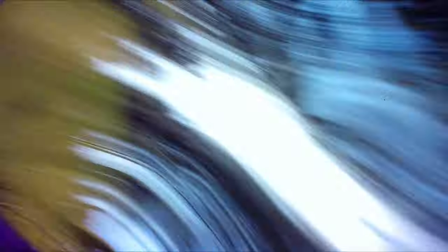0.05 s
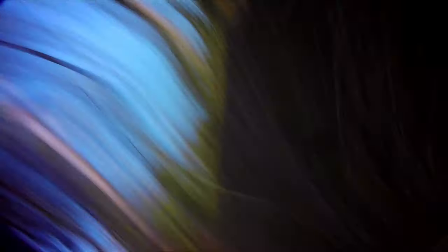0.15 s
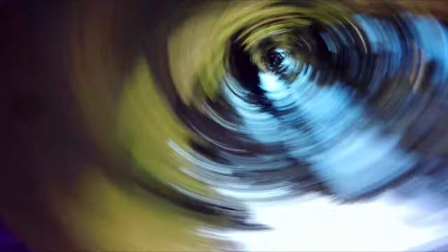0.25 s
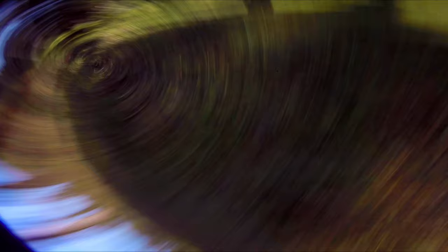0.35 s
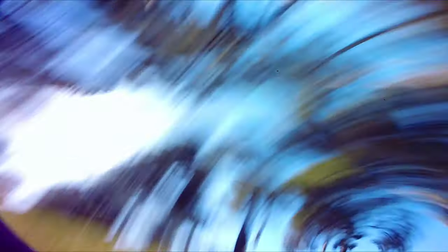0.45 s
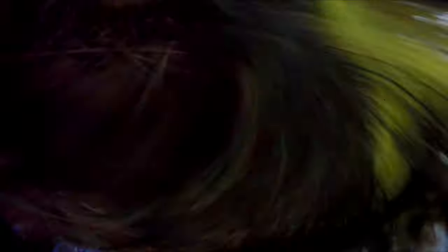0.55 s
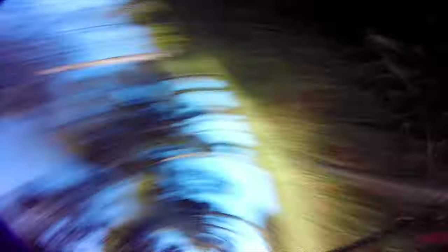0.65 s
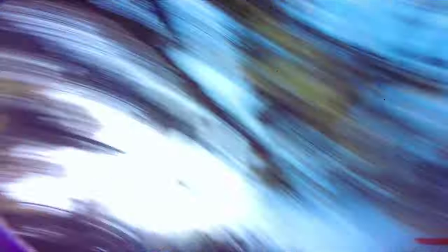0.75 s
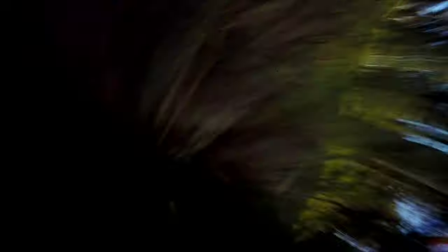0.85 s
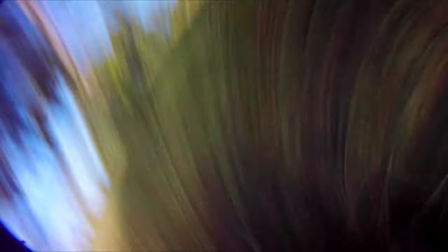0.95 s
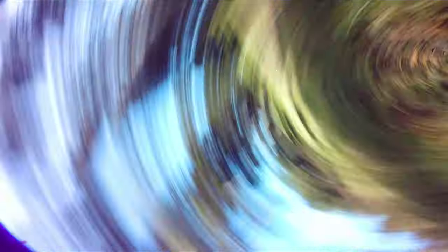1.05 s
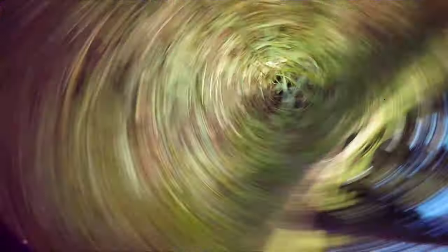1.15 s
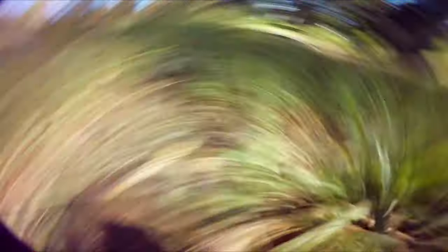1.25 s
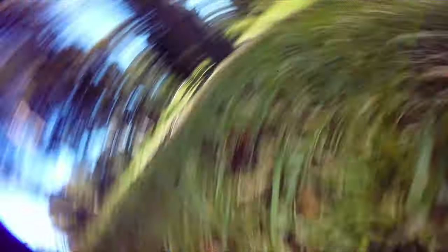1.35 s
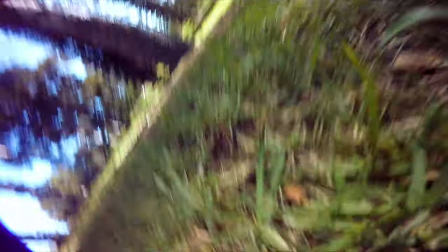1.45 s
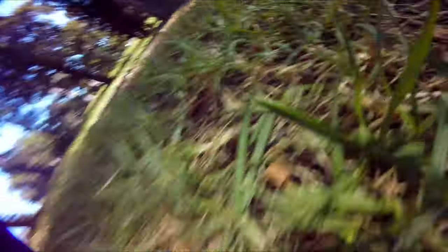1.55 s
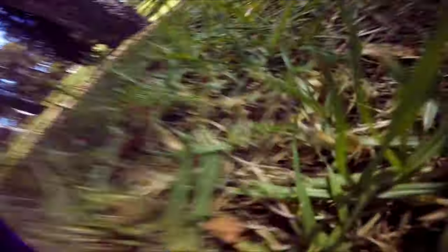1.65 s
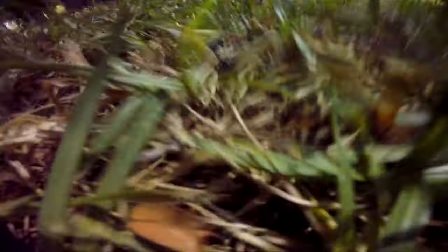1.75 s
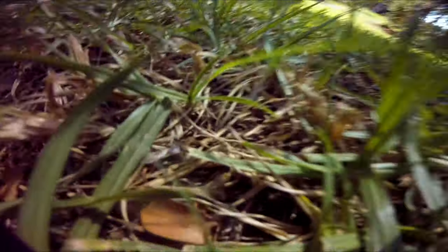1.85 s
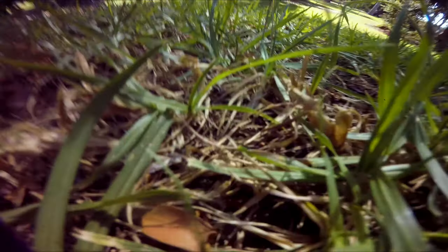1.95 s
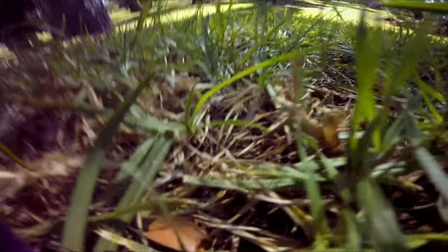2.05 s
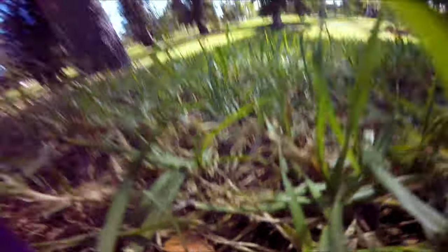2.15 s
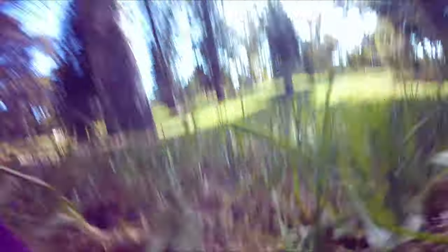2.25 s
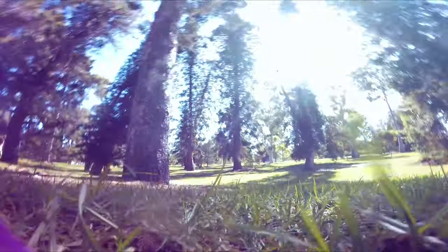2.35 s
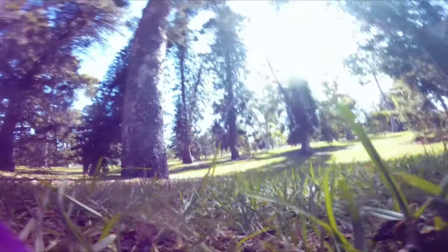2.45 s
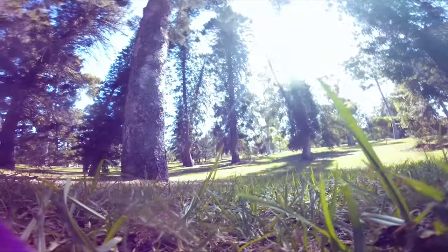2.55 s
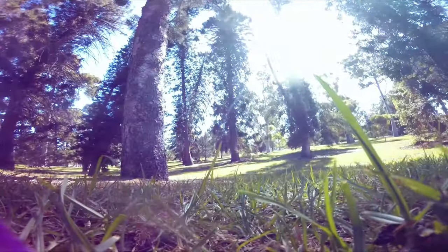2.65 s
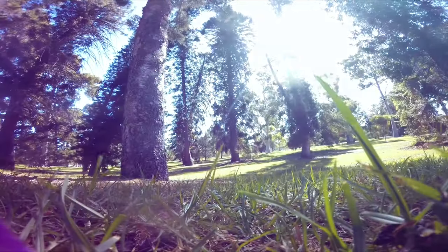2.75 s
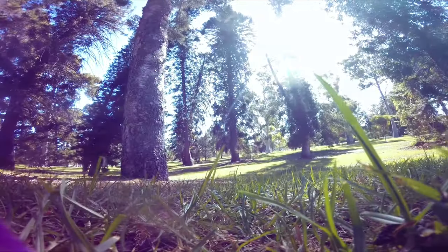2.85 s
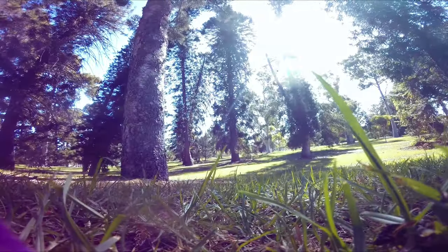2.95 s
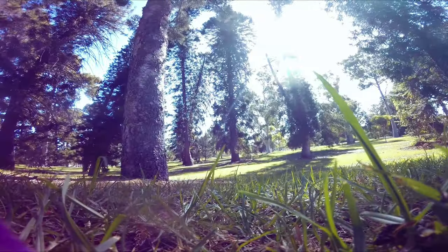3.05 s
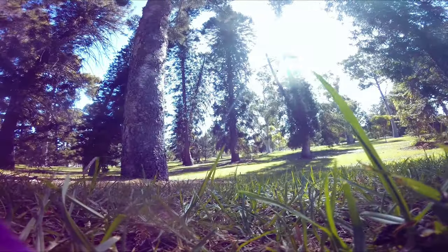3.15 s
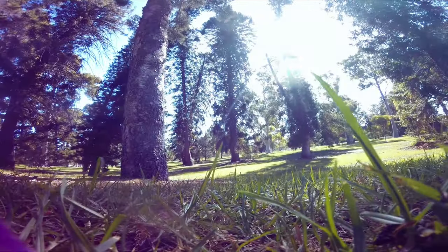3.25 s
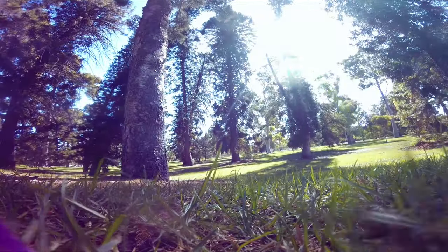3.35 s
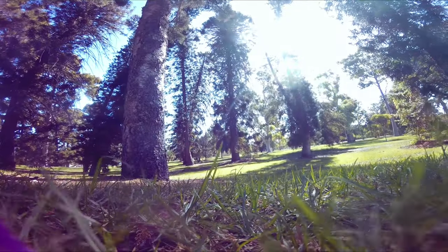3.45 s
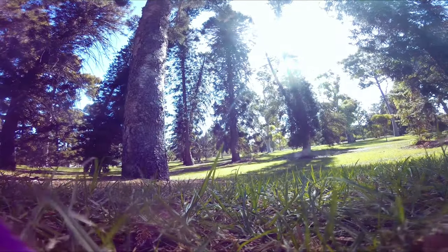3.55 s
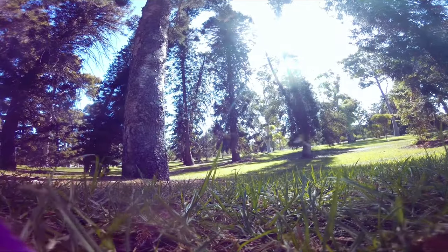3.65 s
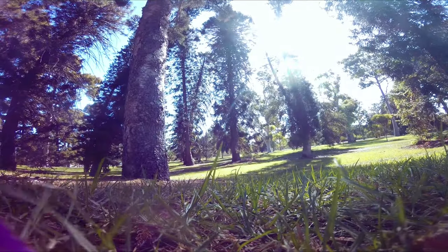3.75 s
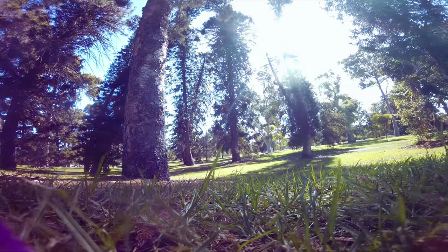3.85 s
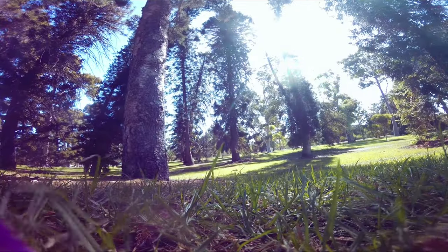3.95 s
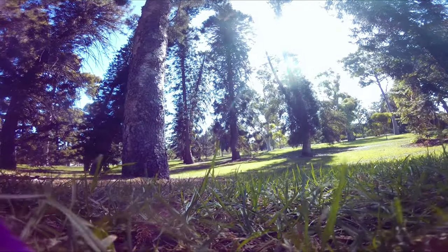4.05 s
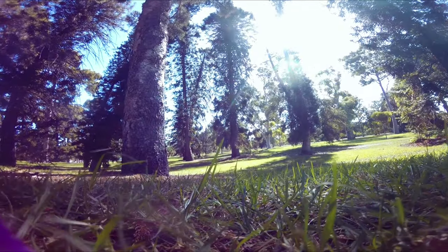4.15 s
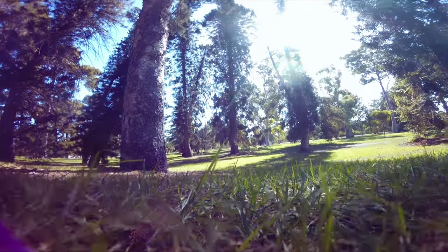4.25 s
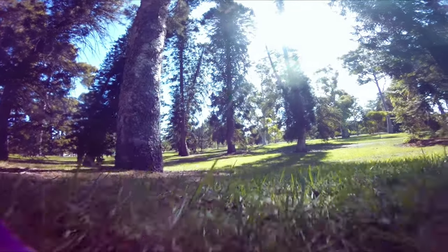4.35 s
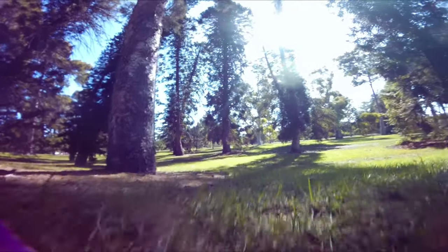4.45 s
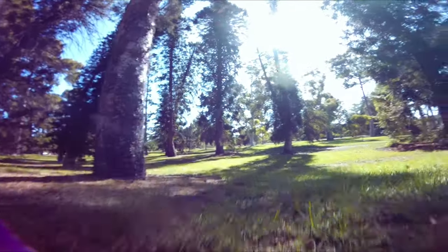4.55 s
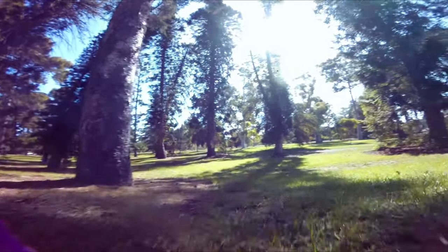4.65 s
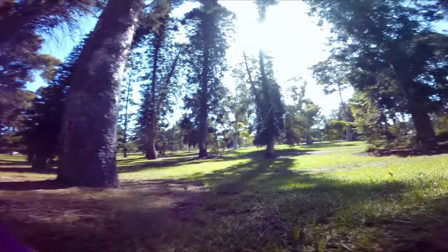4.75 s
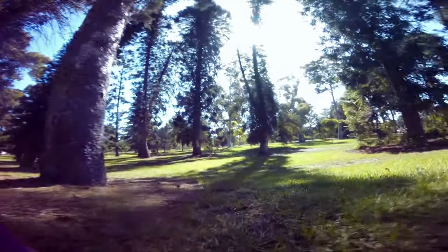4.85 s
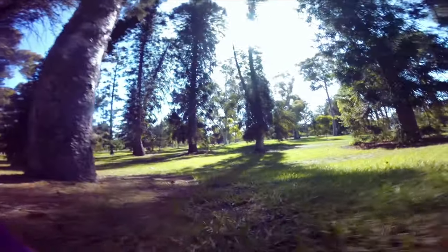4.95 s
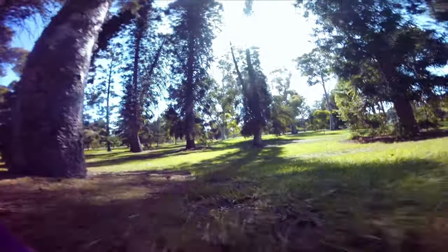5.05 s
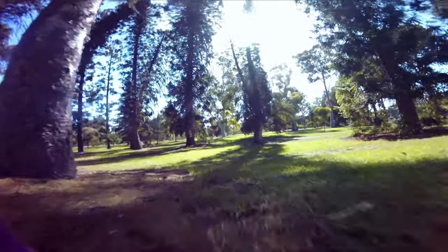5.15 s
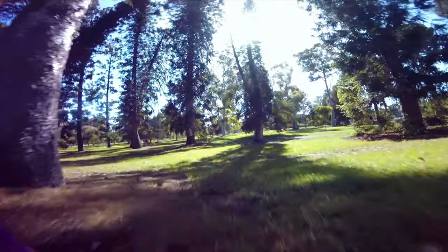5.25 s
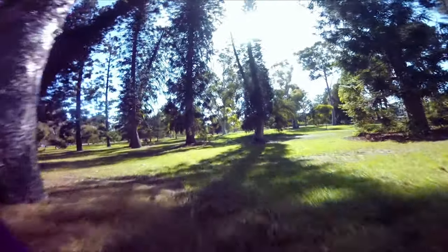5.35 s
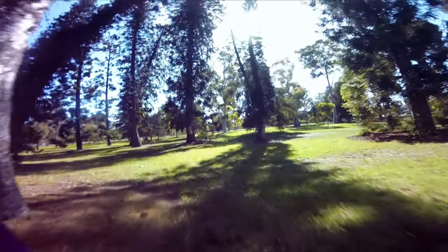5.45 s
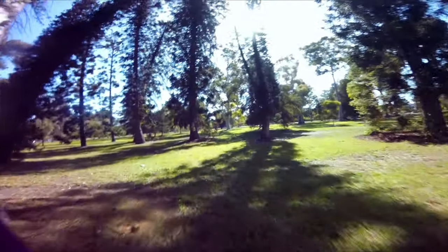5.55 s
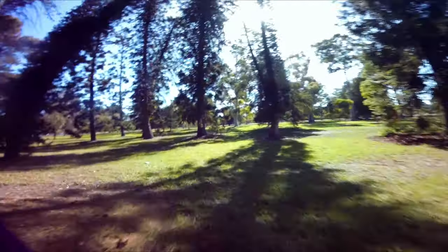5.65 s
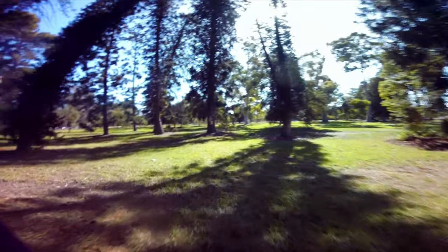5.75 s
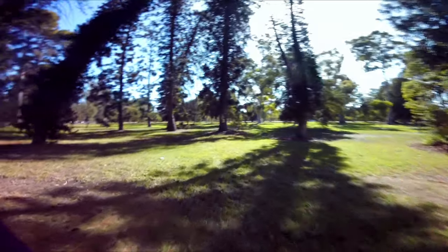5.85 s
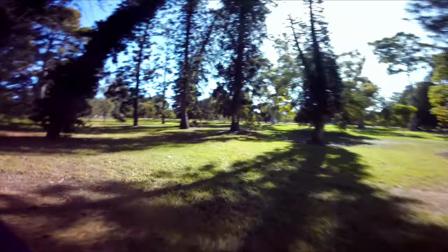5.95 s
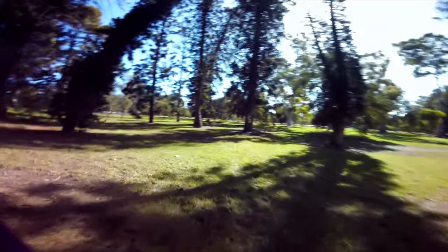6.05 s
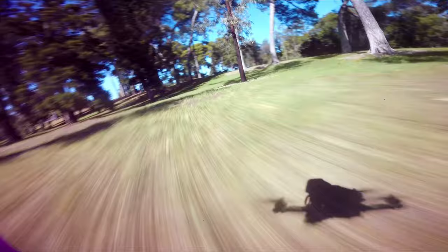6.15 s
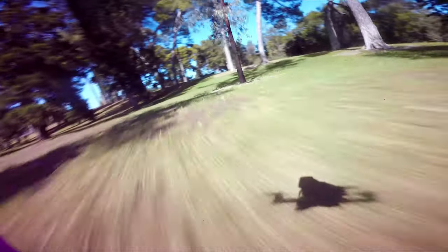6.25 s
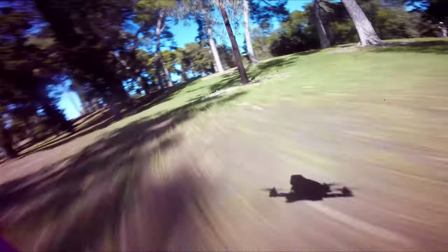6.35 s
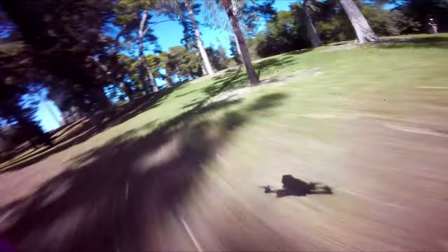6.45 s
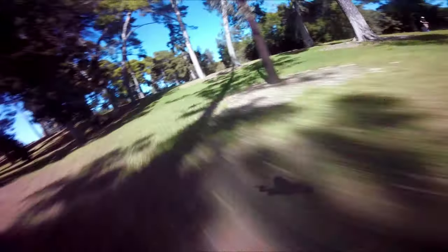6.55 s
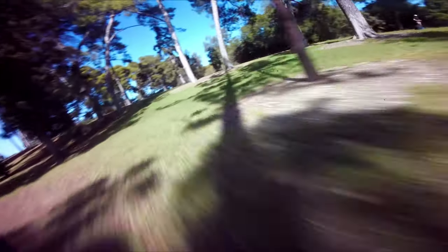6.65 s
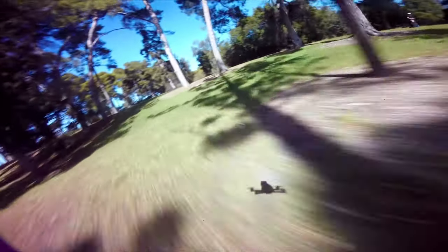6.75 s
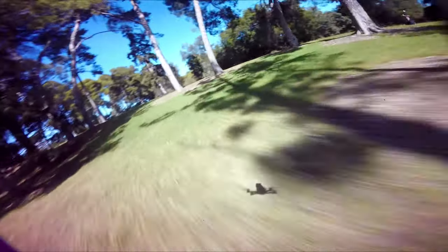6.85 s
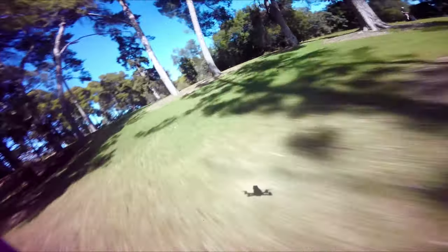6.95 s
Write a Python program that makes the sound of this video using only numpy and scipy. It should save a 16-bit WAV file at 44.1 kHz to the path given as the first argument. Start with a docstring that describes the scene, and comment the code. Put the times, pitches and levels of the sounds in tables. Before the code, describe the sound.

Thuds and knocks of a drone bouncing across a lawn, a faint motor hum, then blades slapping grass and a rising, wavering propeller whine.

```python
"""Thumps, crunches and knocks: a racing quadcopter, heard from its own camera, tumbles over a lawn.
It comes to rest with its motors idling, then throttles up: the three-bladed propellers thrash the
grass, lift it clear and whine with the throttle. One unbalanced motor shakes the frame. Gusts buffet
the microphone at lift-off; then the sound cuts abruptly to fast flight, with louder buzz and shudder."""
import sys
import numpy as np
from scipy.fft import rfft, irfft, next_fast_len
from scipy.io import wavfile
from scipy.ndimage import uniform_filter1d, minimum_filter1d, map_coordinates

SR = 44100
rng = np.random.default_rng(int(sys.argv[2]) if len(sys.argv) > 2 else 0)


def output_pcm(signal):
    """Save a mono or channel-first signal as 16-bit PCM at the path in sys.argv[1].

    Samples are clipped to [-1, 1] before scaling.
    """
    pcm = np.clip(np.atleast_2d(signal).T, -1, 1) * 32767
    wavfile.write(sys.argv[1], SR, np.round(pcm).astype(np.int16))


N = 308700
GROUNDED_S, AT_REST_S, THROTTLE_UP_S, LIFT_OFF_S, FAST_FLIGHT_S = 1.09, 2.38, 3.407, 4.084, 6.205
IDLE_HZ, SLOW_IDLE_HZ, HOVER_HZ = 71.7, 51.7, 200  # shaft rates
BLADES, BAND_LIMIT_HZ = 3, 15375


# Unbalanced shaft's hum and overtones: shaft_multiple, level_db
HUM_ORDERS = [(1, 0), (4, -42), (5, -43)]
SHAFT_OVERTONES = [(2, 1), (3, -9), (6, -19.5), (9, -25), (15, -26.5), (18, -32)]
# Beating propeller pair: speed_ratio, level_db
PAIR = [(1, -1), (.963, -5.5)]
# Rotor gains: hover_db, speed_db_per_doubling, rebound_db, racing_db
HUM_GAIN = (-7.5, 7.5, -6, -7.5)
SHAFT_OVERTONE_GAIN = (-31, -4, -3, 12)
BLADE_TONE_GAIN = (-19, 2, -0.5, -4)
BLADE_OVERTONE_GAIN = (-30, 2.5, 3, -4)

def motors():
    """The unbalanced shaft hums; the propellers whine at neighbouring speeds and beat."""
    shaft_hz, pair_hz, slow_hz = shaft_speeds()
    shaft = rotor_phase(shaft_hz, jitter=0.003, rate_hz=40)
    out = flight_gain(HUM_GAIN) * tones(shaft, HUM_ORDERS, flutter_db=1.5, rate_hz=12)
    out += flight_gain(SHAFT_OVERTONE_GAIN) * tones(shaft, SHAFT_OVERTONES, flutter_db=3, rate_hz=25)
    for ratio, db in PAIR:
        blades = rotor_phase(BLADES * pair_hz * ratio, jitter=0.005, rate_hz=60)
        whine = flight_gain(BLADE_TONE_GAIN) * tones(blades, [(1, 0.007)], flutter_db=0.5, rate_hz=16)
        whine += flight_gain(BLADE_OVERTONE_GAIN) * blade_overtones(blades, BLADES * pair_hz)
        out += amp(db) * whine
    slow_blades = rotor_phase(BLADES * slow_hz, jitter=0.0053, rate_hz=43)
    slow_whine = tones(slow_blades, [(1, 0.0085)], flutter_db=3.5, rate_hz=13)
    slow_whine += amp(-18.5) * blade_overtones(slow_blades, BLADES * slow_hz)
    out += amp(-25.5 + 68 * np.log2(slow_hz / shaft_hz)) * slow_whine  # unloads as it slows
    # In fast flight the slow shaft shakes the frame too, and the hum throbs.
    out += amp(-19.5) * racing() * np.sqrt(2) * np.sin(slow_blades / BLADES)
    return out * ramp(4.04, 0.07)


# Blade pulse harmonics: blade_multiple, level_db
BLADE_OVERTONES = [(2, -3.5), (3, -10.5), (4, -16), (5, -23), (6, -24)]

def blade_overtones(phase, blade_hz):
    """Faster tips give sharper pressure pulses, so the upper harmonics grow with speed."""
    return sum((blade_hz / 690) ** (0.9 * (k - 2)) * tones(phase, [(k, db)], flutter_db=4, rate_hz=70)
               for k, db in BLADE_OVERTONES)


# Unbalanced motor in the climb: time_s, shaft_hz
THROTTLE = [(4.06, 99.5), (4.19, 127.6), (4.41, 176.1), (4.46, 193.1), (4.59, 205), (4.69, 148.2),
            (4.78, 139.5), (4.84, 146.4), (4.93, 182.4), (4.99, 189.3), (5.15, 233.2), (5.25, 244.8),
            (5.38, 235.4), (5.46, 190.8), (5.55, 180.6), (5.82, 199.0), (6.19, 211.2)]
# Other motors' speeds over the unbalanced one's: time_s, pair_ratio, slow_ratio
STEERING = [(4.06, 1.25, 1.085), (4.3, 1.38, 1.11), (4.46, 1.16, 1.045), (4.58, 1.104, 1.036),
            (4.68, 0.93, 0.91), (4.83, 1.013, .95), (5.03, .98, 0.87), (5.16, 1.033, .89),
            (5.38, 0.98, 0.84), (5.52, .945, 0.58), (6.0, 0.95, 0.88), (6.18, 0.97, 0.88),
            (6.24, 0.98, 0.9), (7, 0.97, 1.02)]

def shaft_speeds(racing_hz=221, sag_hz_per_s=16):
    """Shaft rates in Hz: unbalanced motor, pair, slow motor."""
    climb_hz, = curves(THROTTLE)
    fast_hz = racing_hz - sag_hz_per_s * (clock() - FAST_FLIGHT_S)
    shaft_hz = climb_hz + racing() * (fast_hz - climb_hz)
    pair_ratio, slow_ratio = curves(STEERING)
    return shaft_hz, shaft_hz * pair_ratio, shaft_hz * slow_ratio


def flight_gain(gains):
    """A layer follows shaft speed, downwash rebounding off the turf and the cut to fast flight."""
    hover_db, speed_db_per_doubling, rebound_db, racing_db = gains
    speed_db = speed_db_per_doubling * np.log2(shaft_speeds()[0] / HOVER_HZ)
    return amp(hover_db + speed_db + rebound_db * swell(4.38, 0.12) + racing_db * racing())


def racing():
    """0 until the abrupt cut to fast flight, then 1."""
    return ramp(FAST_FLIGHT_S, 0.0058)


# Blade slaps on grass: freq_hz, level_db
THRASH_SPECTRUM = [(26, -41), (45, 1.5), (75, 3.5), (124, 3), (176, -4.5), (242, 3.5), (279, -4), (327, 3),
                   (648, -6.5), (747, -10), (948, -7.5), (1390, -22.5), (2000, -30.5), (2600, -59),
                   (4400, -120)]

def thrash():
    """Labouring blades slap unevenly through the grass; the first blow is the hardest."""
    slaps = coloured(grains(per_s=900) + 1.03 * rng.standard_normal(N), THRASH_SPECTRUM)
    shaft = rotor_phase(105, jitter=0.0678, rate_hz=14)
    labour = tones(shaft, [(1, -6), (2, -10.5), (3, -7)], flutter_db=7, rate_hz=30)
    labour *= amp(-9) * (1 - ramp(LIFT_OFF_S, 0.064))
    first_blow = 1 + cusp(THROTTLE_UP_S, 0.01, 0.039)
    return amp(-12.5 + grass_contact_db(tuft_weight=0.68)) * first_blow * (slaps + labour)


# Tufts caught by the blades: centre_s, half_length_s, boost_db
TUFTS = [(3.53, 0.11, 5), (3.783, 0.026, 4), (4.094, 0.056, 4)]

def grass_contact_db(tuft_weight, clear_db_per_s=37):
    """Blade contact grows in each tuft and dies away as the craft rises."""
    tufts_db = sum(db * swell(centre_s, half_length_s) for centre_s, half_length_s, db in TUFTS)
    return tuft_weight * tufts_db - clear_db_per_s * np.maximum(clock() - LIFT_OFF_S, 0)


# Landings on turf: start_s, give_s, thump_db, thump_hz, crunch_db, thud_db
LANDINGS = [(0.116, 0.016, -6.5, 49, -40, -31), (0.164, 0.02, -7.5, 64, -26.5, -18),
            (0.585, 0.009, -1.5, 69, -25.5, -13), (.633, 0.0074, -22, 50, -16.5, -32.5),
            (.647, 0.011, -4, 47.4, -19, -12.5), (0.904, .014, -4.5, 40.4, -37, -27),
            (0.928, 0.007, -21, 47, -23.5, -11), (.939, 0.013, -6.5, 46.2, -26.5, -10.5),
            (1.339, .017, -7, 34.8, -27, -15.5), (1.373, 0.017, -12, 67.3, -47, -30),
            (1.806, 0.0075, -10.5, 70, -40.5, -26), (1.875, .019, -13, 106, -49, -29),
            (2.357, 0.016, -6.5, 27.8, -40, -16), (2.402, 0.013, -14.5, 72.5, -60, -25)]
# Crushed grass, turf, clattering arms and propellers: freq_hz, level_db
CRUNCH_SPECTRUM = [(530, -5), (900, -2), (1400, 0), (1900, -6), (2500, -9.5), (3200, -9.5), (4200, -13),
                   (5500, -12), (6800, -8.5), (8500, -18), (10500, -28), (15000, -61)]
TURF_SPECTRUM = [(50, -4.5), (110, 6), (320, -2.5), (600, -15), (1200, -28), (2500, -70)]
CLATTER_SPECTRUM = [(700, -29), (1200, -3), (1700, -1), (2600, -1.5), (3200, -18.5), (5000, -43)]

def bounces():
    """Each landing rocks the camera on its soft mount and crushes grass; hard ones clatter."""
    thumps, crunch, thud = np.zeros((3, N))
    t = np.arange(SR // 3) / SR
    for start_s, give_s, thump_db, thump_hz, crunch_db, thud_db in LANDINGS:
        rocking = t / give_s * np.exp(1 - t / give_s) * np.sin(2 * np.pi * thump_hz * t)
        add(thumps, start_s, amp(thump_db) * rocking)
        pressure = cusp(start_s + 0.63 * give_s, rise_s=0.0081, fall_s=0.013)
        crunch += amp(crunch_db) * pressure
        thud += amp(thud_db) * pressure
    fibres = crackle(per_s=2600, decay_s=0.00089) + 0.49 * rng.standard_normal(N)
    grass = amp(-1) * crunch * coloured(fibres, CRUNCH_SPECTRUM)
    clatter = amp(2.5) * crunch ** 1.38 * coloured(grains(per_s=900), CLATTER_SPECTRUM)
    return thumps + grass + clatter + thud * noise(TURF_SPECTRUM)


def crackle(per_s, decay_s):
    """Fibres break at random, each a tiny ring at its own pitch."""
    out, t = np.zeros(N + SR), np.arange(200) / SR
    when, pitch, size = rng.random((int(per_s * N / SR), 3)).T[:, :, None]
    strength = amp(-4 * np.log(1 - size)) * pitch ** 0.25
    pitch_hz = BAND_LIMIT_HZ * pitch ** 1.5
    rings = strength * np.exp(-t / decay_s) * np.sin(2 * np.pi * pitch_hz * t)
    np.add.at(out, (when * N).astype(int) + np.arange(len(t)), rings)
    return unit_rms(out[:N])


# Hard contacts and snapping stalks: start_s, level_db
KNOCKS = [(0.955, -3.5), (1.337, -11), (1.405, -18), (1.509, -21.5), (1.765, -22.5), (1.806, -15),
          (1.822, -26), (2.205, -3.5), (2.303, -19), (2.366, -8), (2.383, -5.5), (2.456, -17), (2.491, -19),
          (2.514, -12.5), (2.604, -18.5), (2.69, -20)]
STALKS = [(0.038, -44), (0.3508, -34.5), (0.5645, -21.5), (0.6886, -18), (.7193, -30), (0.7685, -20.5),
          (.9844, -20.5), (1.513, -34), (1.7775, -20.5)]
# Frame modes: pitch_hz, level_db, t60_s
FRAME_MODES = [(328, 0, 0.057), (417, 1, 0.049), (617, -3.5, 0.031), (720, -22.5, 0.061),
               (1007, -23, 0.071), (1780, -29, 0.028)]

def knocks():
    """Hard contacts ring the frame; stalks snap against it on and between landings."""
    rings, cracks = np.zeros((2, N))
    t = np.arange(SR // 5) / SR
    attack = (1 - np.exp(-t / 0.00023)) ** 2
    for start_s, db in KNOCKS:
        sizes = amp(0.99 * rng.standard_normal(len(FRAME_MODES)))
        ring = sum(size * amp(mode_db - 60 * t / t60_s) * np.sin(2 * np.pi * (hz * t + rng.random()))
                   for size, (hz, mode_db, t60_s) in zip(sizes, FRAME_MODES))
        add(rings, start_s, amp(db - 8.5) * ring * attack)
    landing_snaps = [(start_s, crunch_db + 6.5) for start_s, *_, crunch_db, _ in LANDINGS]
    for start_s, db in STALKS + landing_snaps:
        add(cracks, start_s, amp(db - 13 - 60 * t / 0.022))
    return rings + cracks * noise(CRUNCH_SPECTRUM)


# Propeller air noise: freq_hz, level_db
WASH_SPECTRUM = [(800, -21), (1200, 4), (1500, 2), (2000, 3.5), (2500, -2), (3000, -20.5), (3600, -22),
                 (4800, -16.5), (6500, -59)]
RASP_SPECTRUM = [(2200, -25), (2800, 0.5), (3500, -0.5), (4400, -6), (5300, -3), (6500, -31)]
HISS_SPECTRUM = [(3500, -35.5), (4400, -13.5), (5000, -13), (5700, -2), (6400, -1.5), (7700, -5),
                 (10200, -13.5), (11800, -26), (13700, -30), (15300, -46)]
CHURN_SPECTRUM = [(200, -7), (400, 10), (700, 7), (1000, -6), (1500, -4.5), (2500, -52)]
# Churned air: hover_db, speed_db_per_doubling, rebound_db, racing_db
CHURN_GAIN = (-29, -6, 6, 4.5)

def propeller_air():
    """Wash, tip rasp and hiss pulse with the blades over a low churn; cut grass adds to them."""
    shaft_hz, pair_hz, _ = shaft_speeds()
    boost_db, cutting = treble_db(), amp(grass_contact_db(tuft_weight=1.15))
    blades = rotor_phase(BLADES * pair_hz, jitter=0.0097, rate_hz=40)
    shaft = rotor_phase(shaft_hz, jitter=0.022, rate_hz=40)
    chop = unit_rms(1 + 0.49 * np.cos(blades) + 0.13 * np.cos(shaft))
    spitting = amp(2 * (1 - ramp(LIFT_OFF_S, 0.58)) * wobble(220))  # cut stalks, until clear
    gusts = amp(1.1 * wobble(20))
    wash = np.hypot(amp(-32 + 0.72 * boost_db), amp(-40) * cutting) * gusts * noise(WASH_SPECTRUM)
    rasp = np.hypot(amp(-46.5 + 2 * boost_db), amp(-42) * cutting) * noise(RASP_SPECTRUM)
    hiss = amp(-37.5 + boost_db + 0.97 * wobble(20)) * noise(HISS_SPECTRUM)
    churn = flight_gain(CHURN_GAIN) * noise(CHURN_SPECTRUM) * (0.43 + 0.62 * ramp(3.82, 0.22))
    return (wash + rasp + hiss) * chop * spitting + churn


# Treble under power: time_s, level_db
TREBLE = [(3.46, -39), (3.96, -43), (4.06, -34), (4.25, -34.5), (4.3, -32), (4.41, -31.5), (4.84, -38.5),
          (4.9, -34.5), (4.96, -38.5), (5.01, -33), (5.36, -39.5), (5.4, -42.5), (6.1, -37), (6.28, -38.5),
          (6.93, -35.5), (6.94, -35.5)]

def treble_db(mean_db=-38):
    """Treble level above its mean."""
    return curves(TREBLE)[0] - mean_db


# Frame rattle: freq_hz, level_db
BUZZ_SPECTRUM = [(1100, -23), (1290, -3), (1430, 5.5), (1600, -23), (1920, -11), (2200, -41), (2900, -15),
                 (3200, -7), (3550, -17), (3900, -18), (4300, -48)]

def frame_buzz():
    """Stiff parts rattle once per shaft turn under load, most in fast flight."""
    gain = amp(-56.5 + 1.7 * treble_db()) + amp(-32.5) * racing()
    shaft = rotor_phase(shaft_speeds()[0], jitter=0.0062, rate_hz=35)
    strikes = np.exp(0.67 * np.cos(shaft))
    return gain * coloured(strikes * rng.standard_normal(N), BUZZ_SPECTRUM)


# Gusts on frame and microphone: freq_hz, level_db
SHUDDER_SPECTRUM = [(50, -48), (110, -4), (250, -4), (340, -11), (600, -18), (900, -36)]
BUFFET_SPECTRUM = [(10, -20), (25, -3.5), (70, 0), (110, -3.5), (200, -8.5), (400, -45)]
# Gust gains: hover_db, speed_db_per_doubling, rebound_db, racing_db
SHUDDER_GAIN = (-27, 0.5, 9, 10)
BUFFET_GAIN = (-26.5, -0.5, 14, 0)

def turbulence():
    """Gusts buffet the microphone, most just after lift-off; the frame shudders more in fast flight."""
    shudder = flight_gain(SHUDDER_GAIN) * amp(2 * wobble(18)) * noise(SHUDDER_SPECTRUM)
    buffet = flight_gain(BUFFET_GAIN) * amp(1.1 * wobble(16)) * noise(BUFFET_SPECTRUM)
    return (shudder + buffet) * ramp(3.77, 0.28)


# Frame sliding through grass: centre_s, half_length_s, stir_db, hiss_db, scrape_db
SLIDES = [(0.176, 0.1, -44, -67, -47), (0.51, 0.11, -48.5, -92, -43), (0.724, .045, -36, -63, -27),
          (0.844, 0.04, -39, -59, -22.5), (0.972, 0.037, -35.5, -57, -26), (1.43, 0.097, -52.5, -67, -38),
          (1.834, 0.07, -39.5, -55, -24.5), (2.2, 0.14, -54, -62.5, -29), (2.362, 0.059, -33, -48.5, -23),
          (2.5, 0.07, -54, -61, -32)]
# Stirred grass, blade-tip ticks: freq_hz, level_db
STIR_SPECTRUM = [(180, 3.5), (300, 1.5), (420, -8), (490, -17), (600, -11.5), (1060, -16.5), (1740, -23),
                 (3200, -29), (4500, -36), (6000, -65)]
TICK_SPECTRUM = [(250, -11), (500, 6), (1000, -10.5), (1900, -11), (2800, -30), (6000, -40), (9000, -65)]

def rustle():
    """Grass brushes the sliding frame, is ticked by idling blade tips and stirs in their draught."""
    stir, hiss, scrape = sum(np.outer(amp(levels_db), swell(centre_s, half_length_s))
                             for centre_s, half_length_s, *levels_db in SLIDES)
    tumbling = 1 - ramp(GROUNDED_S, 1.02)
    draught = amp(-21 * tumbling)  # builds as the craft settles
    turns = rotor_phase(IDLE_HZ, jitter=0.04, rate_hz=30) / (2 * np.pi)
    tip_contact = np.exp(-(turns % 1) / 0.14)
    tick_gain = (amp(-7.5) * stir + amp(-65)) * amp(3 * wobble(40)) * tumbling
    ticks = tick_gain * coloured(tip_contact * rng.standard_normal(N), TICK_SPECTRUM)
    low = (stir + amp(-43.5) * draught) * amp(1.5 * wobble(35)) * noise(STIR_SPECTRUM)
    hiss_gain = (hiss + amp(-68.5) * draught) * amp(1.4 * wobble(54))
    high = hiss_gain * coloured(grains(per_s=5000), HISS_SPECTRUM)
    mic_wind = amp(-38.5 - 3.3 * tumbling) * noise(BUFFET_SPECTRUM)
    turf = scrape * noise(TURF_SPECTRUM)
    return (low + high + ticks + turf + mic_wind) * (1 - ramp(THROTTLE_UP_S, 0.044))


# Faster idling motor's hum: time_s, level_db
IDLE_HUM = [(0, -30.5), (.75, -42.5), (1.15, -45.5), (1.7, -48), (2.1, -32.5), (2.55, -28), (2.8, -46)]
# Slower idling motor's harmonics: shaft_multiple, level_db
IDLE_ORDERS = [(2, 0), (3, -1), (4, -14), (5, -7), (6, -17), (7, -24)]

def idle():
    """Two motors hum through the frame until throttle-up; at rest it passes more overtones."""
    hum_db, = curves(IDLE_HUM)
    fast_shaft = rotor_phase(IDLE_HZ, jitter=0.014, rate_hz=9.9)
    hum = amp(hum_db) * tones(fast_shaft, [(1, 1), (2, -17.5), (3, -23)], flutter_db=1.2, rate_hz=9.8)
    slow_shaft = rotor_phase(SLOW_IDLE_HZ, jitter=0.00586, rate_hz=15)
    settling = 0.58 * ramp(GROUNDED_S, 0.15) + 0.76 * ramp(1.92, 0.15)
    low = tones(slow_shaft, IDLE_ORDERS[:1], flutter_db=3.5, rate_hz=15) * settling
    upper = tones(slow_shaft, IDLE_ORDERS[1:], flutter_db=2.5, rate_hz=8) * ramp(AT_REST_S, 0.41)
    return (hum + amp(-35.5) * (low + upper)) * (1 - ramp(THROTTLE_UP_S, 0.13))


def rotor_phase(hz, jitter, rate_hz):
    """Phase in radians of a rotor whose speed the flight controller keeps nudging."""
    return 2 * np.pi * (np.cumsum(hz * (1 + jitter * wobble(rate_hz))) / SR + rng.random())


def tones(phase, orders, flutter_db, rate_hz):
    """Rotor harmonics, each fluttering on its own."""
    return np.sqrt(2) * sum(
        amp(db + flutter_db * wobble(rate_hz)) * np.sin(k * phase + 2 * np.pi * rng.random())
        for k, db in orders)


def coloured(x, spectrum):
    """x filtered by (freq_hz, level_db) points, at rms 1."""
    size = next_fast_len(N + 8192)
    freq_hz, level_db = np.transpose(spectrum)
    log_bins = np.log(np.fft.rfftfreq(size, 1 / SR) + 1)
    gain = amp(np.interp(log_bins, np.log(freq_hz), level_db, left=-120, right=-120))
    return unit_rms(irfft(rfft(x, size) * gain, size)[:N])


def noise(spectrum):
    return coloured(rng.standard_normal(N), spectrum)


def grains(per_s):
    """Tiny random impacts, at rms 1."""
    return unit_rms(rng.standard_normal(N) * (rng.random(N) < per_s / SR))


def wobble(rate_hz):
    """Smooth random curve with knots at rate_hz."""
    return map_coordinates(rng.standard_normal(int(N * rate_hz / SR) + 4), [clock() * rate_hz])


def curves(rows):
    """Each column after time_s, interpolated per sample."""
    time_s, *columns = np.transpose(rows)
    return [np.interp(clock(), time_s, column) for column in columns]


def ramp(start_s, length_s):
    return np.clip((clock() - start_s) / length_s, 0, 1)


def swell(centre_s, half_length_s):
    return np.exp(-((clock() - centre_s) / half_length_s) ** 2)


def cusp(peak_s, rise_s, fall_s):
    """Pressure builds to 1 at peak_s, then lets go."""
    return np.exp(-np.maximum((peak_s - clock()) / rise_s, (clock() - peak_s) / fall_s))


def add(track, start_s, sound):
    part = track[round(start_s * SR):][:len(sound)]
    part += sound[:len(part)]


def amp(db):
    return 10 ** (np.asarray(db) / 20)


def unit_rms(x):
    return x / np.sqrt(np.mean(x ** 2) + 1e-20)


def clock():
    return np.arange(N) / SR


def scene():
    """Tumble and idle, then powered flight; mono."""
    tumble = idle() + rustle() + bounces() + knocks()
    flight = thrash() + motors() + frame_buzz() + propeller_air() + turbulence()
    return (tumble + ramp(THROTTLE_UP_S, 0.001) * flight)[None]


def record(dry):
    """The camera limits the peaks and passes nothing above its band limit."""
    needed_gain = np.minimum(1, 0.93 / (np.abs(dry) + 1e-9))
    gain = uniform_filter1d(minimum_filter1d(needed_gain, size=441), size=441)  # 10 ms windows
    passband = np.fft.rfftfreq(N, 1 / SR) < BAND_LIMIT_HZ
    return irfft(rfft(dry * gain) * passband, N)


dry = scene()
out = record(dry)
output_pcm(out)
```